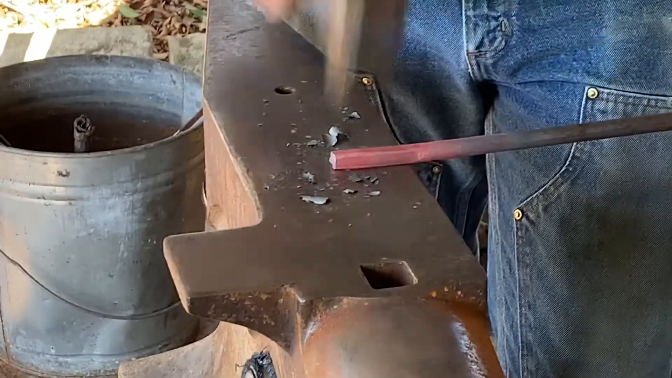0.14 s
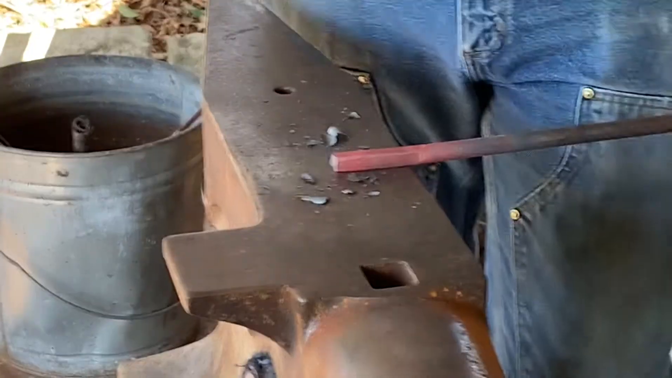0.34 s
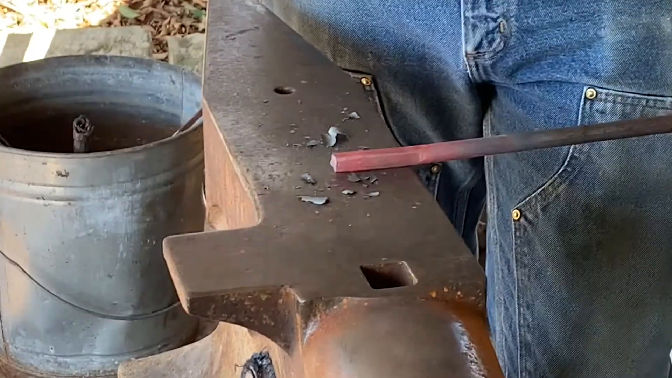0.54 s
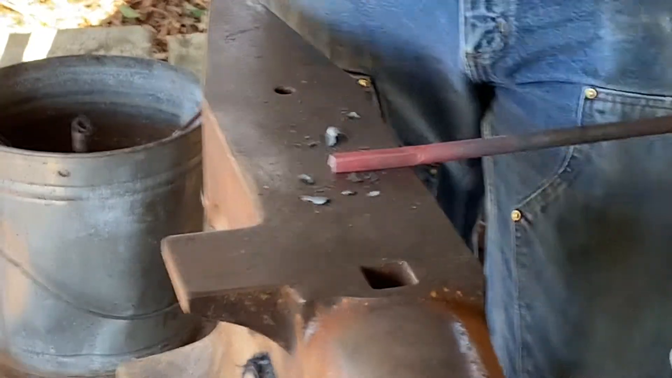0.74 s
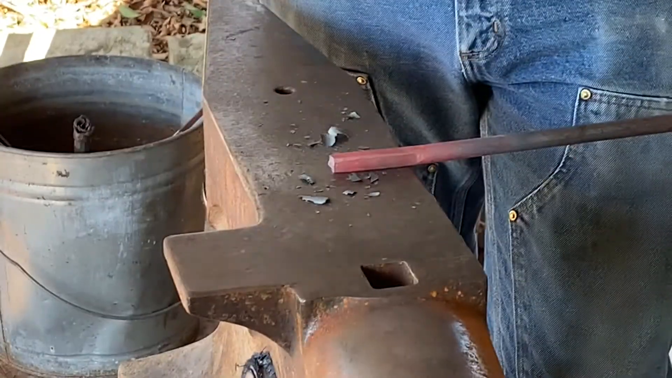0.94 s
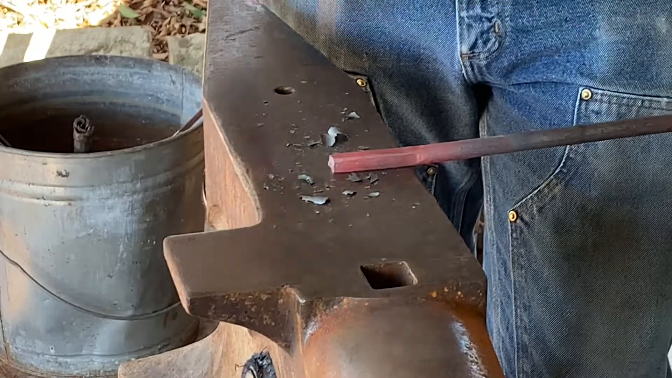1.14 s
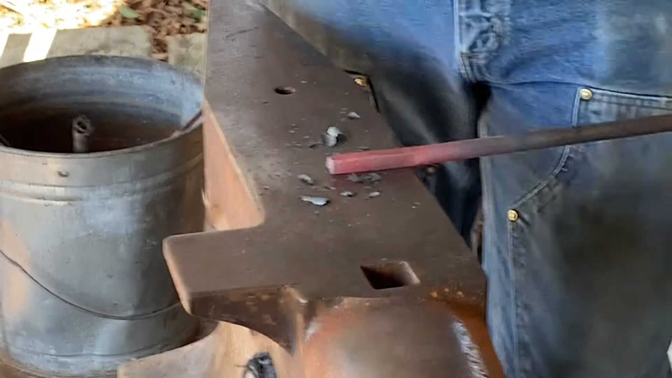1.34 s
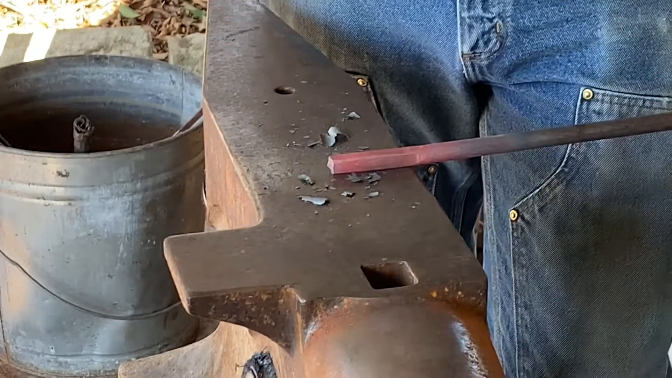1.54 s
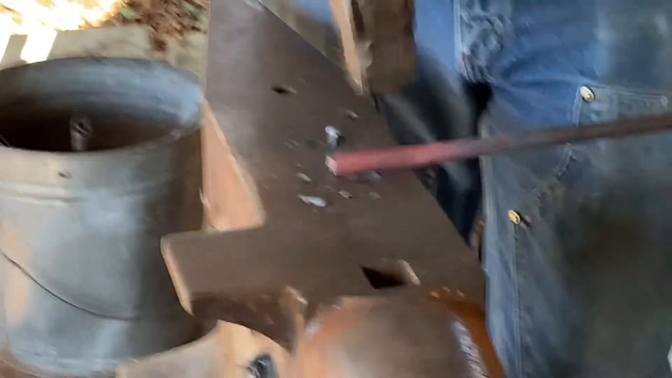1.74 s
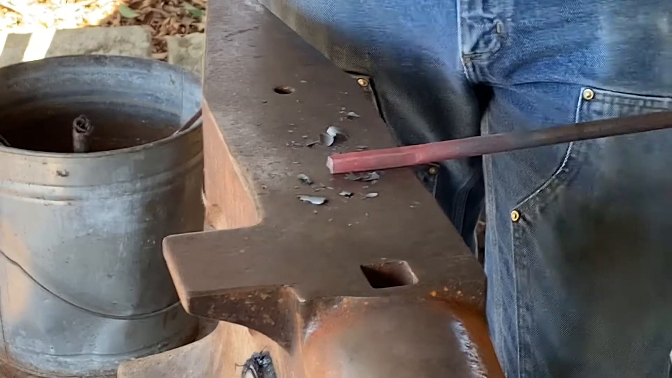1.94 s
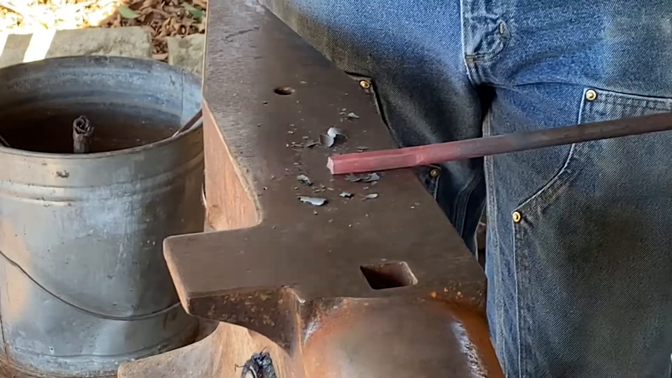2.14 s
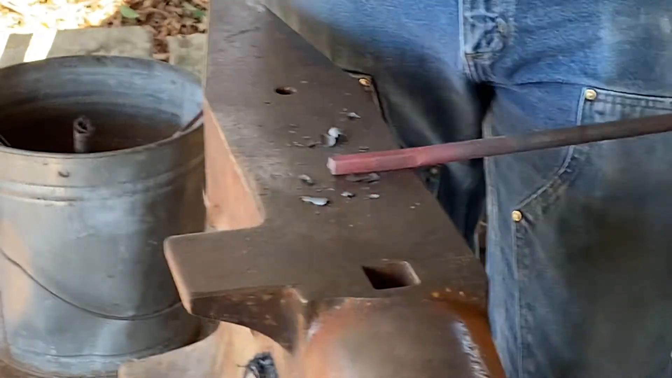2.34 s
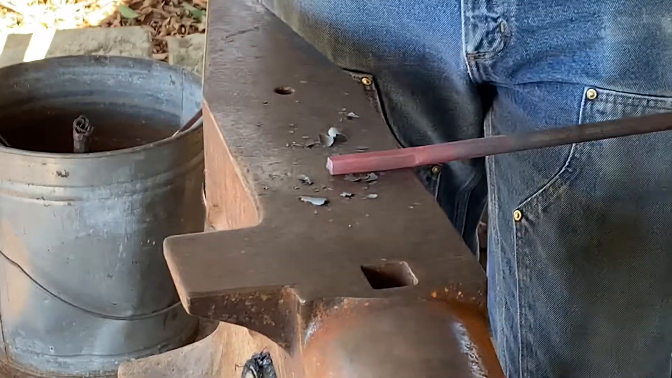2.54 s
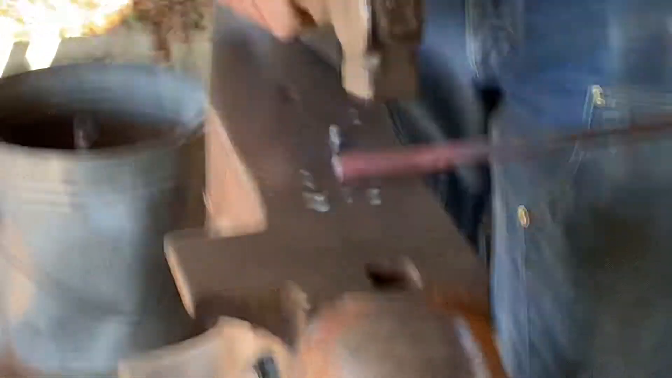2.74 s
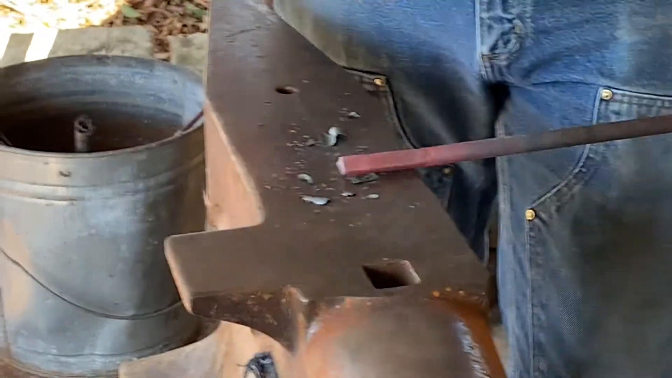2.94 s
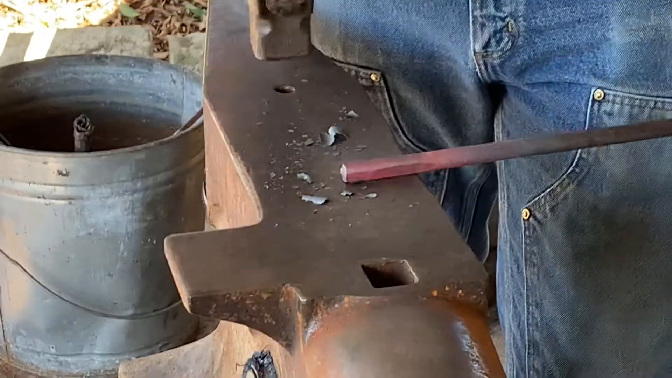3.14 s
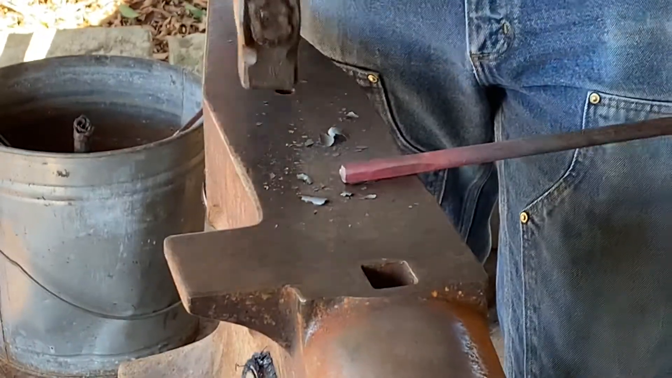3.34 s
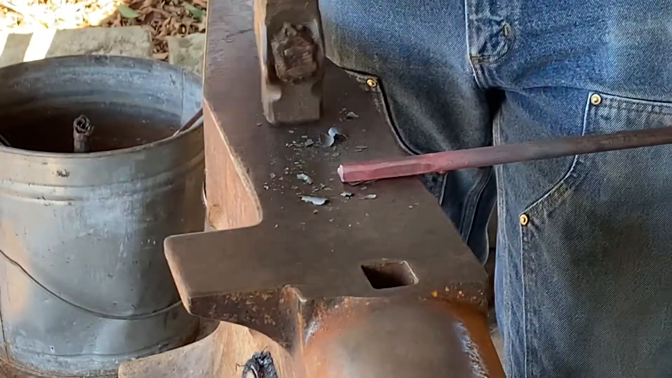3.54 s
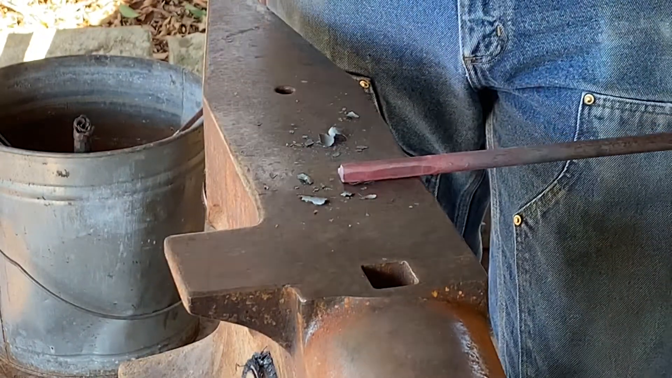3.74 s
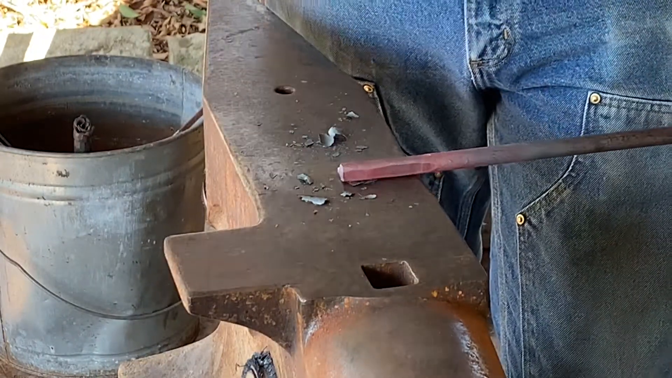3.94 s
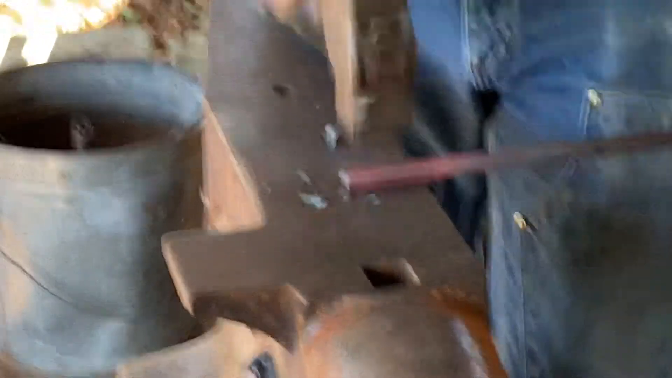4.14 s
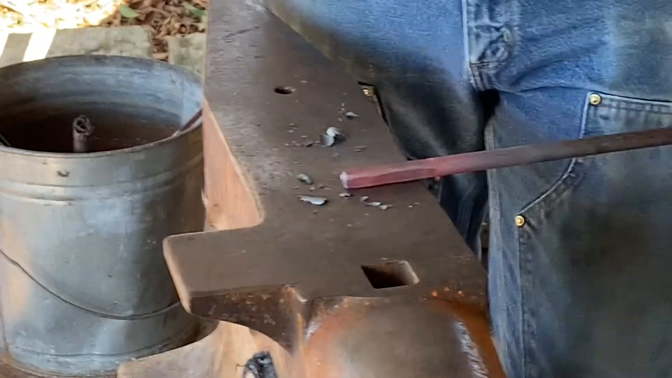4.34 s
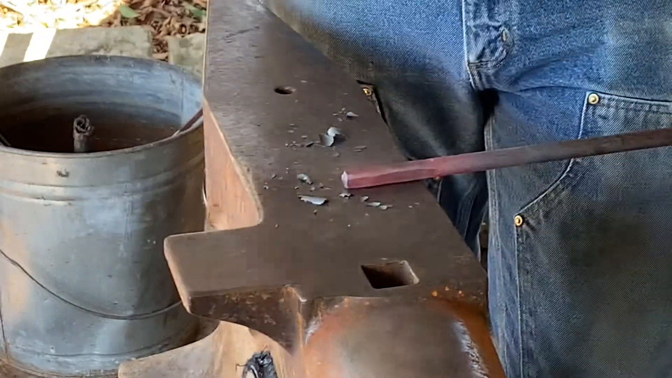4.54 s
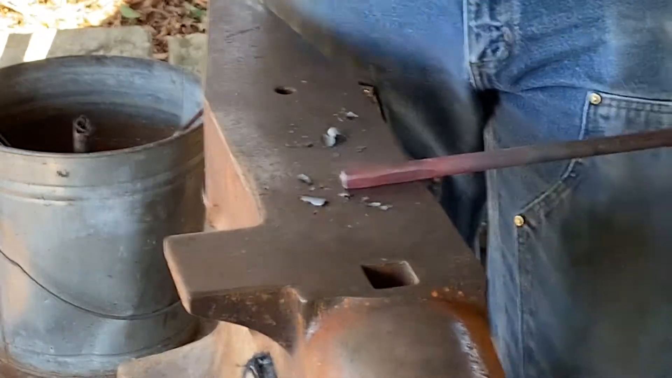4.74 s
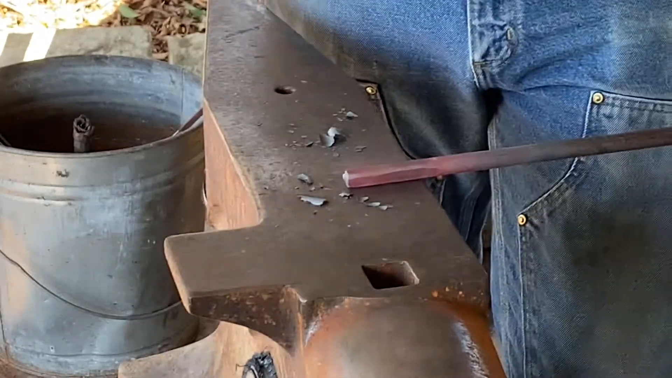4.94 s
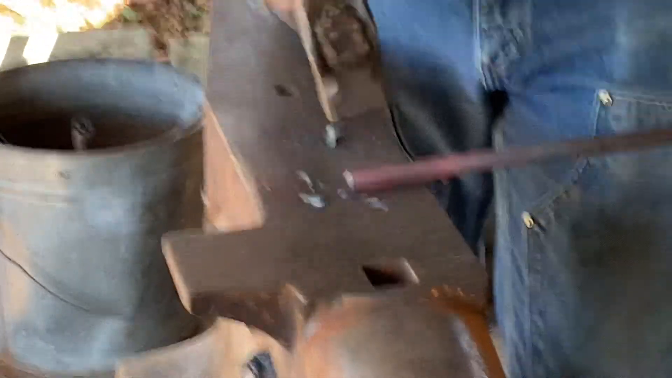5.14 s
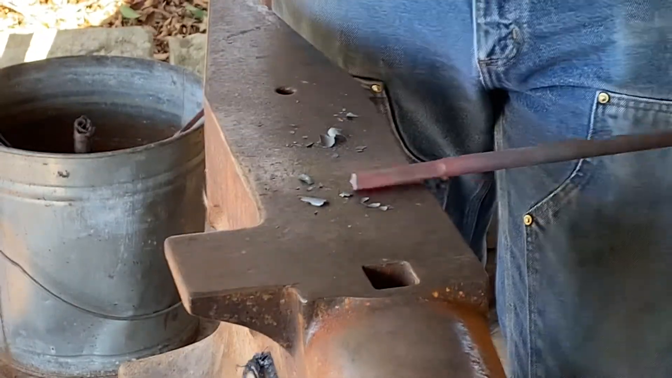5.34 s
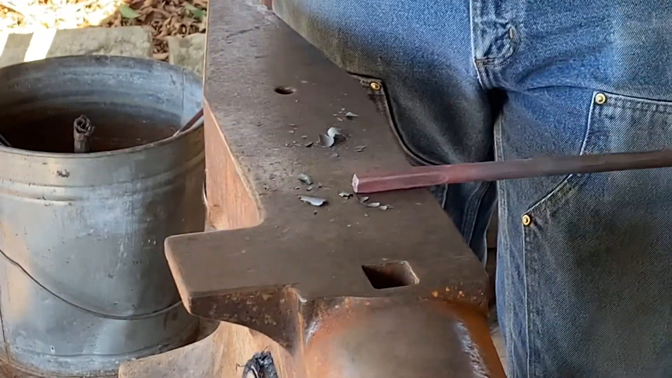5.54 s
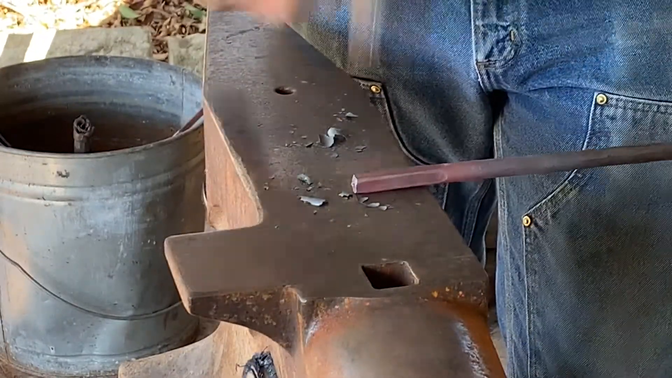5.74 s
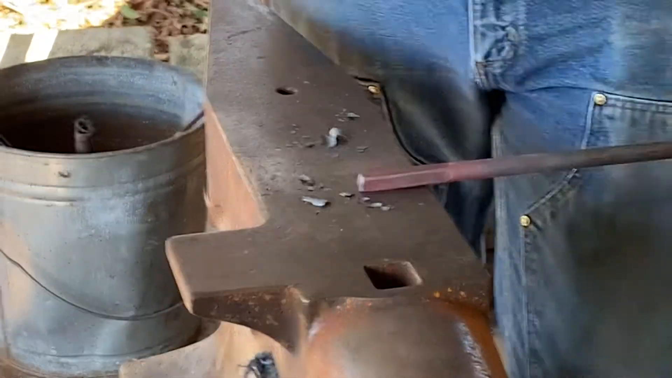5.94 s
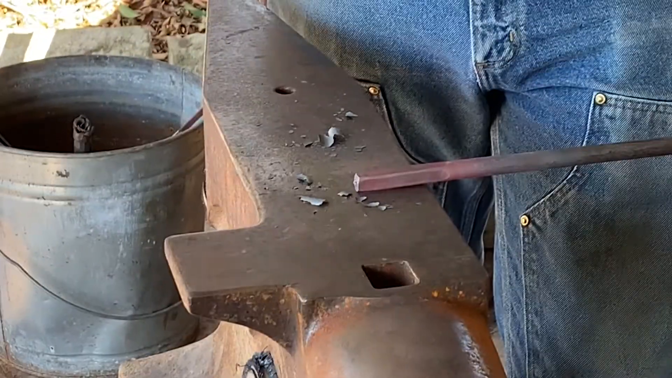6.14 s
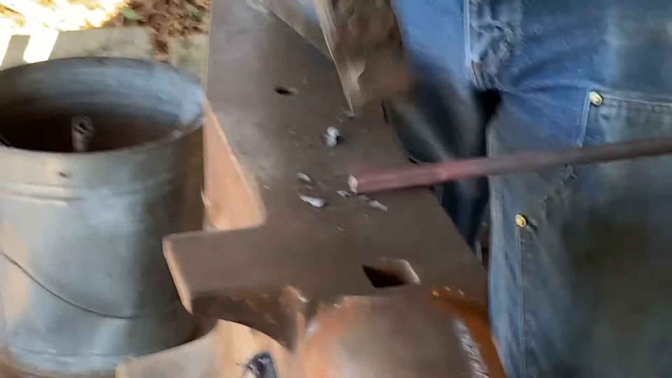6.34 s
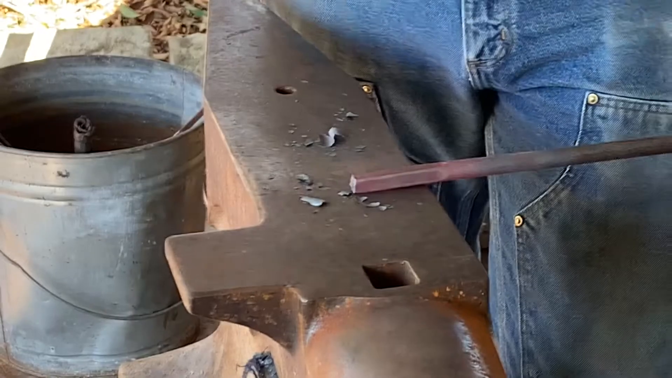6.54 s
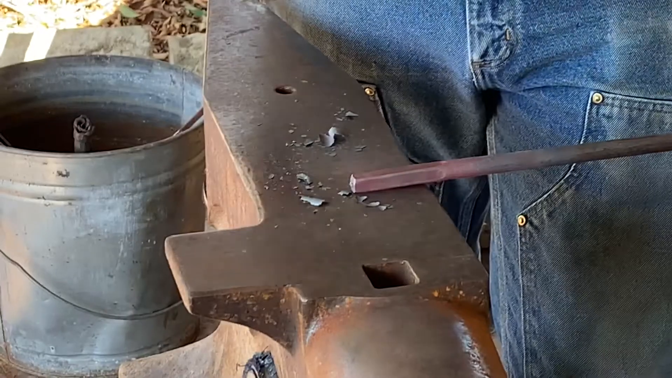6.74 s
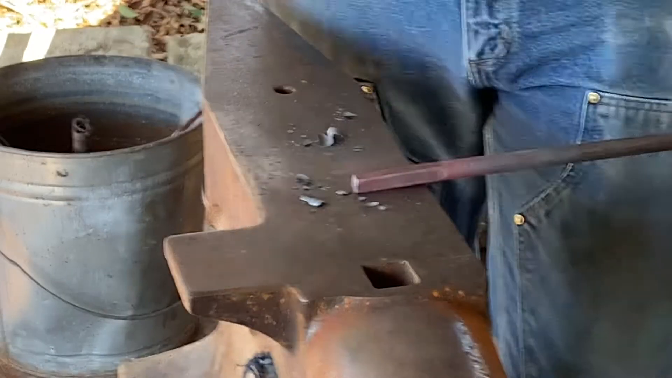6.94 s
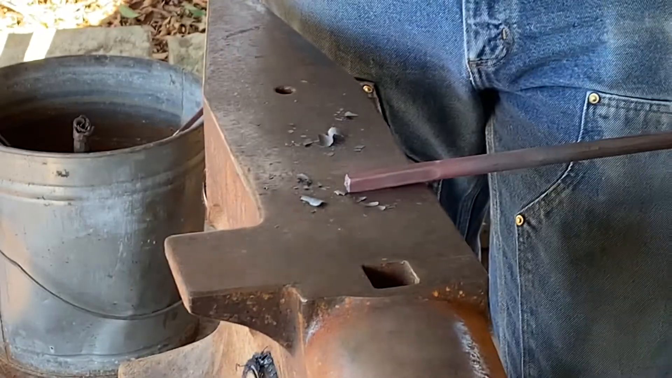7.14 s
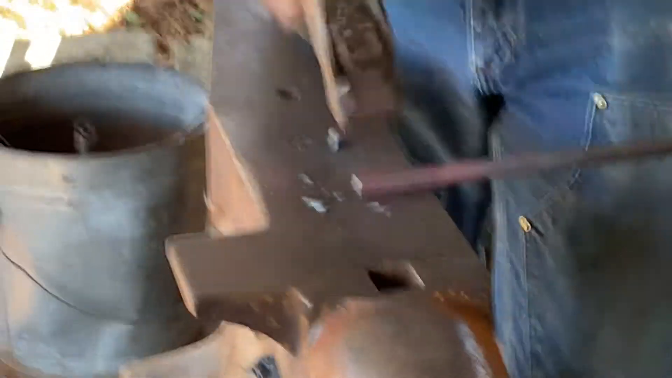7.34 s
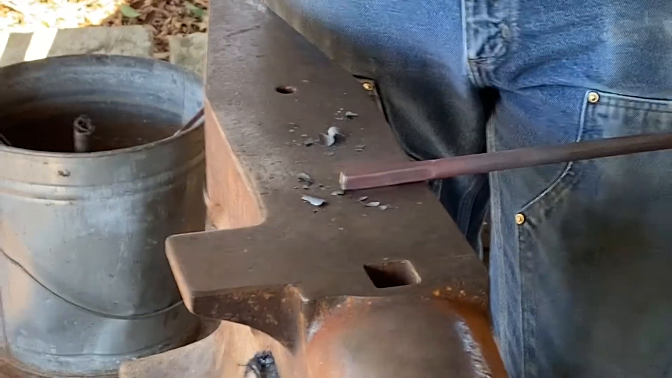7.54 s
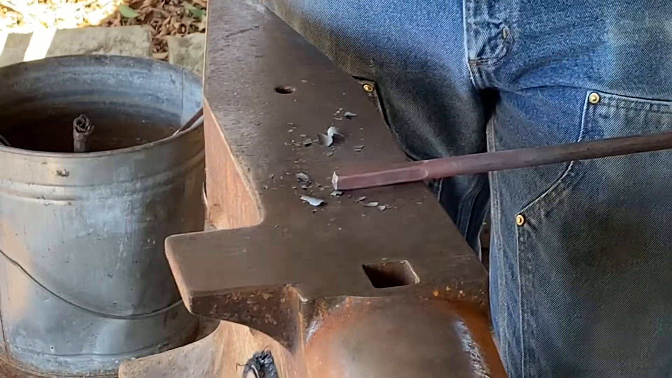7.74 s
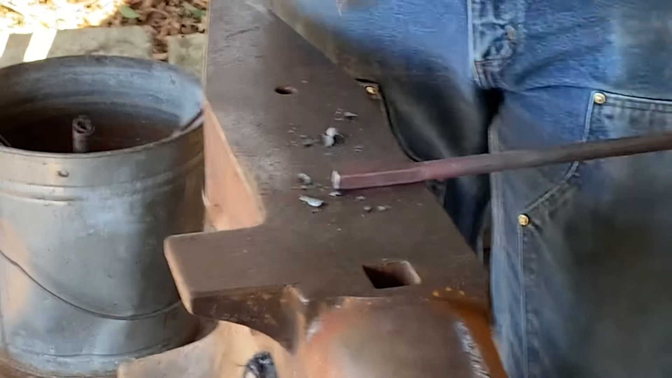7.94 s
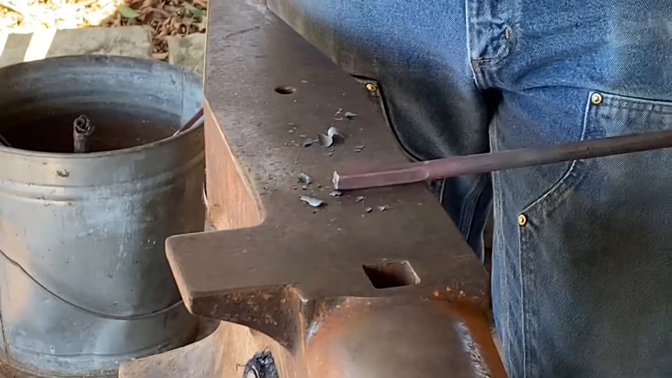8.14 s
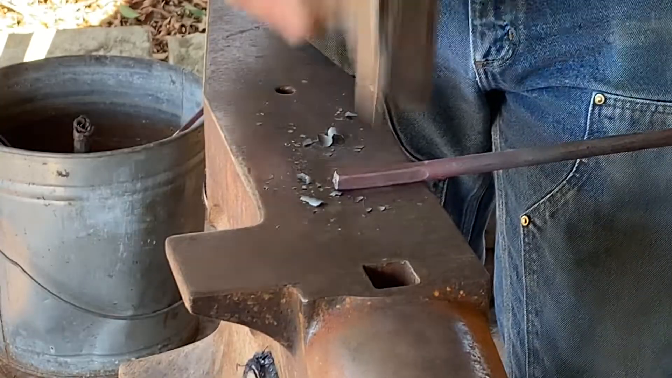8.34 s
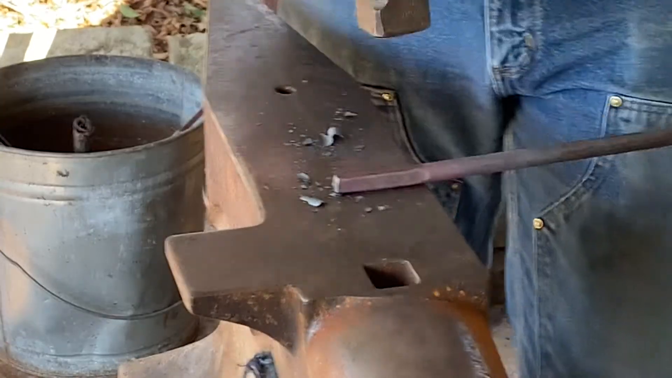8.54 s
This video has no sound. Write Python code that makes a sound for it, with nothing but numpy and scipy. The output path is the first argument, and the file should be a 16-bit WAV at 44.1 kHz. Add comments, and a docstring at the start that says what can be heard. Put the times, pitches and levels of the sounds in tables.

```python
"""Under a shed roof, two microphone ports close together: a forge burner roars nearby throughout.
An old anvil ring is dying as a hand hammer begins to forge a hot bar; each blow clanks, rings the anvil
and sends a late thud through its stand. Near 3.1 s the hammer bounces to rest on the bare face.
Forging resumes at 4.1 s; at 8.1 s the bar scrapes faintly, before the last blow.
The right port hears the treble with a lag; gain control ducks the loudest moments."""
import sys
import numpy as np
from scipy import signal
from scipy.fft import rfft, irfft, next_fast_len
from scipy.io import wavfile
from scipy.ndimage import uniform_filter1d

SR = 44100
rng = np.random.default_rng(int(sys.argv[2]) if len(sys.argv) > 2 else 0)


def to_wav(s):
    """Save 16-bit WAV."""
    ch = np.atleast_2d(s).T  # columns
    pcm = np.round(np.clip(ch, -1, 1) * 32767)  # PCM
    wavfile.write(sys.argv[1], SR, pcm.astype(np.int16))


N = 378368


def amp(db):
    """Decibels to gain."""
    return 10 ** (np.asarray(db) / 20)


def at_hz(table, hz, axis=1):
    """One column of a table, joined on a log-frequency axis."""
    table = np.array(table)
    return np.interp(np.log(hz), np.log(table[:, 0]), table[:, axis])


def lowpass(x, order, hz):
    """Butterworth low-pass."""
    return signal.sosfilt(signal.butter(order, hz, fs=SR, output="sos"), x)


def bandpass(x, low_hz, high_hz):
    """Second-order Butterworth band-pass."""
    return signal.sosfilt(signal.butter(2, [low_hz, high_hz], "band", fs=SR, output="sos"), x)


# likeness of the diffuse sound at the two ports: (pitch [Hz], left-right likeness [0..1])
PORT_LIKENESS = [(100, 0.98), (300, 0.95), (700, 0.49), (1500, 0.044), (5500, 0.022), (8000, 0.94)]


def pair(mid, side, hz):
    """Left and right from two noises, as alike as the field is at this pitch."""
    alike = np.clip(at_hz(PORT_LIKENESS, hz), 0, 1)
    opposed = side * [[1], [-1]]
    return (np.sqrt(1 + alike) * mid + np.sqrt(1 - alike) * opposed) / np.sqrt(2)


# burner roar and the hiss above it: (pitch [Hz], level [dB per Hz])
ROAR_COLOUR = [(30, -26), (60, -12), (100, -6.5), (200, -9.5), (450, -10.5), (560, -17.5), (750, -31.5),
               (1300, -30), (2000, -38.5), (3100, -41), (5000, -47.5), (8500, -51.5), (11500, -43.5),
               (15500, -51.5)]
# resonances of the forge chamber: (pitch [Hz], width [Hz], boost [dB])
CHAMBER = [(162.8, 56, 13.5), (230.6, 18.3, 14.5), (317.6, 25.7, 14), (422.6, 25, 7)]
ROAR_DB = -34


def burner(flutter_db=2.0, flutter_hz=6):
    """Flame noise through the chamber resonances, fluttering a little."""
    hz = np.maximum(np.arange(N // 2 + 1) * SR / N, 1)
    colour_db = at_hz(ROAR_COLOUR, hz)
    for peak_hz, width_hz, boost_db in CHAMBER:
        colour_db = colour_db + boost_db / (1 + ((hz - peak_hz) / (width_hz / 2)) ** 2)
    mid, side = rfft(rng.standard_normal((2, N))) * amp(colour_db)
    roar = irfft(pair(mid, side, hz), N)
    flutter = lowpass(rng.standard_normal(N), 2, flutter_hz)
    level_db = ROAR_DB + flutter_db * flutter / flutter.std()
    return amp(level_db) * roar / roar.std()


# forging blows on the bar; the first falls before time zero and only its ring is left:
# (time [s], clank [dB], clank treble [dB], low ring [dB], middle ring [dB], treble ring [dB],
#  spot on the face [-1..1], lowest mode [dB re low ring], first and second long ring [dB re their family])
BLOWS = [(-0.32, -4.5, -1, -12.5, -13, -28, 0.99, 11, -0.5, 13),
         (0.194, 0.5, 0.5, -18.5, -30.5, -29, 0.7, 2, -6.5, 15),
         (0.675, -0.5, 2.5, -20.5, -17.5, -25.5, 0.71, 8, 0.5, 10),
         (1.207, -0.5, 0, -19.5, -24.5, -28.5, 0.45, 6, -2.5, -7),
         (1.72, 0, 2.5, -25, -15.5, -25.5, 0.62, 11, 4.5, 7),
         (2.225, -3.5, 4, -27, -15, -28, 0.83, 10, 5.5, -5),
         (2.744, -3.5, 6.5, -25, -14.5, -26, 0.73, 1.5, 3.5, 5),
         (4.135, -6, 1, -29.5, -37, -47, 0.56, 14, -13.5, 17),
         (4.637, -4, 5, -22, -27, -34.5, 0.46, -1, -0.5, -9),
         (5.13, -4, 1, -20, -27, -32, 0.19, -1.5, -3.5, -15),
         (5.808, -3, 2.5, -23, -15, -27, 0.32, -2, -6, 10), (6.317, 0, 0, -20.5, -25.5, -33, 1, 6, -8, 8),
         (6.831, -1.5, 5, -15, -17, -30, 1, 1.5, -4, 8),
         (7.336, -3.5, 4, -19, -19.5, -29.5, 0.88, 1, -3, 12),
         (7.837, -3, -1, -21.5, -16, -27.5, -0.055, 11, -3.5, 13.5),
         (8.406, -2, 2, -16.5, -12, -31, 0.95, 3, -4, 8)]
# the hammer, dropped on the bare face, bounces to rest:
# (time [s], clank [dB], clank treble [dB], hammer ring [dB])
BOUNCES = [(3.101, -14, -18.5, -20), (3.298, -17.5, -26, -24), (3.415, -17.5, -33, -29.5),
           (3.493, -20, -37, -30)]
# anvil rings under a bounce: (low [dB re hammer ring], middle [same], treble [dB re clank treble])
BOUNCE_RINGS_DB = [-26.5, -16, -23.5]
BOUNCE_SPOT = -0.52   # where bounces land on the face, -1..1


def contacts():
    """Blows and bounces in time order; columns as for a blow, then the hammer ring in dB."""
    low_db, middle_db, treble_ring_db = BOUNCE_RINGS_DB
    rows = [row + (-np.inf,) for row in BLOWS]   # no hammer ring on the soft bar
    for s, clank_db, treble_db, head_db in BOUNCES:
        rings_db = (head_db + low_db, head_db + middle_db, treble_db + treble_ring_db)
        rows.append((s, clank_db, treble_db) + rings_db + (BOUNCE_SPOT, 0, 0, 0, head_db))
    return np.array(sorted(rows)).T


def clicks(gains):
    """One click at each contact from time zero on."""
    s = contacts()[0]
    out = np.full(N, 1e-18)
    out[np.round(s[s >= 0] * SR).astype(int)] = gains[s >= 0]
    return out


def fade(gains, t60):
    """An envelope that jumps at each click and dies."""
    return signal.lfilter([1], [1, -amp(-60 / (t60 * SR))], clicks(gains))


# anvil mode pitches: (pitch [Hz])
ANVIL_HZ = [1765, 1811, 3049, 3202, 5660, 5770, 5927, 6595, 7638, 7861, 8080, 8235, 8420, 8622, 8723, 8990,
            9372, 9793, 10055, 10513, 13677, 14210, 14505, 15056, 15366, 15485, 3035, 3056, 1816]
STOP_S = 0.0024   # a blow fades the old ring out in this time


def rings(hz, t60, struck_db, bloom):
    """Modes build and die after every contact, dealt into five groups; a blow stops older rings."""
    s, blows, t = contacts()[0], np.array(BLOWS)[:, 0], np.arange(SR) / SR
    hz, t60 = np.array(hz)[:, None], np.array(t60)[:, None]
    envelopes = np.minimum(t * hz / bloom, 1) * amp(-60 * t / t60)
    shapes = envelopes * np.sin(2 * np.pi * hz * t)
    # the twin of the low ring starts against it, so the pair swells
    shapes[hz[:, 0] == ANVIL_HZ[-1]] *= -1
    dealt = np.arange(5)[:, None] == np.arange(len(hz)) % 5
    out = np.zeros((5, N + 2 * SR))   # a spare second at each end
    for start, gains in zip(s, amp(struck_db).T):
        left = np.append(blows[blows > start], np.inf)[0] - start   # time to the next blow
        at = SR + round(start * SR)
        out[:, at:at + SR] += (dealt * gains) @ shapes * np.clip(1 + (left - t) / STOP_S, 0, 1)
    return out[:, SR:SR + N]


# anvil modes at those pitches: (level [dB within the family], t60 [s])
ANVIL = [(7, 0.17), (0, 0.64), (5, 0.24), (1, 0.09), (3, 0.28), (-6, 0.36), (-7, 1.14), (-5, 0.4), (8, 0.2),
         (5, 0.27), (-1.5, 0.15), (2, 1.4), (1.5, 0.4), (4, 0.95), (-8.5, 0.6), (-8.5, 0.2), (-0.5, 0.38),
         (7, 0.3), (-13.5, 0.44), (-1.5, 0.5), (8, 0.99), (0.5, 1.4), (7.5, 0.76), (-1, .59), (2, 0.43),
         (-1, 0.5), (-19, 0.5), (-15, 0.5), (-10, 0.35)]
# families of treble modes of the anvil: (pitch [Hz], level [dB re treble ring], tilt [dB per unit of spot])
FAMILIES = [(5800, 2, -4.5), (8337, -9, 14.5), (8835, 1, -2), (9800, 0, 1.5), (10510, -3, 14.5),
            (14200, -22, -4), (15300, -16.5, 9)]
# long modes whose strength differs from blow to blow: (pitch [Hz])
LONG_RING_HZ = [5927, 14210]
# hammer head, heard in bounces: (pitch [Hz]); (level [dB re hammer ring], t60 [s])
HAMMER_HZ = [3391, 3974, 4422, 4692, 6783, 4560]
HAMMER = [(-9, 0.2), (-9.5, 0.2), (-7, 0.3), (-8, 0.07), (-20, 0.33), (-17, 0.12)]
# wooden handle, heard in bounces: (pitch [Hz]); (level [dB re hammer ring], t60 [s])
HANDLE_HZ = [484, 528, 1114]
HANDLE = [(4, 0.09), (-9, 0.2), (-0.5, 0.057)]
# bar: (pitch [Hz]); (level [dB re clank], t60 [s])
BAR_HZ = [742, 966, 1111, 2231]
BAR = [(-27, 0.24), (-30, 0.16), (-36.5, 0.39), (-29, 0.29)]
LOW_RING_TOP_HZ, MIDDLE_RING_TOP_HZ = 2300, 4200
# cycles a mode takes to build: low ring; lowest mode and middle ring; treble and hammer; short modes
LOW_SWELL_CYCLES, SWELL_CYCLES, BLOOM_CYCLES, CLANG_BLOOM_CYCLES = 70, 110, 5.3, 6.2


def anvil_strengths():
    """Strength of each anvil mode at each contact, in dB: by register, and in the treble by spot."""
    _, _, _, low_db, middle_db, treble_db, spot, lowest_db, *long_db, _ = contacts()
    family_hz, family_db, per_spot_db = np.transpose(FAMILIES)
    struck_db = []
    for hz in ANVIL_HZ:
        k = np.argmin(abs(np.log(hz / family_hz)))   # nearest family
        if hz < LOW_RING_TOP_HZ:
            struck_db.append(low_db)
        elif hz < MIDDLE_RING_TOP_HZ:
            struck_db.append(middle_db)
        else:
            struck_db.append(treble_db + family_db[k] + per_spot_db[k] * spot)
    struck_db[0] = low_db + lowest_db
    for hz, db in zip(LONG_RING_HZ, long_db):
        k = ANVIL_HZ.index(hz)
        struck_db[k] = struck_db[k] + db
    return struck_db


def anvil_bloom(hz):
    """Cycles an anvil mode takes to build: the low and middle rings are slower."""
    if ANVIL_HZ[0] < hz < LOW_RING_TOP_HZ:
        return LOW_SWELL_CYCLES
    return SWELL_CYCLES if hz < MIDDLE_RING_TOP_HZ else BLOOM_CYCLES


def metal(scatter_db=2.0, waver=0.13, waver_hz=11):
    """Anvil, hammer, handle and bar ring as decaying sine modes."""
    s, clank_db, *_, head_db = contacts()
    struck_db = anvil_strengths() + [head_db] * len(HAMMER + HANDLE) + [clank_db] * len(BAR)
    level_db, t60 = np.transpose(ANVIL + HAMMER + HANDLE + BAR)
    scatter = rng.normal(0, scatter_db, (len(s), len(t60))).T
    struck_db = struck_db + level_db[:, None] + scatter
    bloom = [anvil_bloom(hz) for hz in ANVIL_HZ]
    bloom += [BLOOM_CYCLES] * len(HAMMER) + [CLANG_BLOOM_CYCLES] * len(HANDLE + BAR)
    all_hz = ANVIL_HZ + HAMMER_HZ + HANDLE_HZ + BAR_HZ
    groups = rings(all_hz, t60, struck_db, np.array(bloom)[:, None])
    # the rings waver, neighbouring modes apart from each other and a little differently on each side
    slow = lowpass(rng.standard_normal((2, 5, N)), 2, waver_hz)
    slow = slow + slow[0]
    return np.sum(groups * (1 + waver * slow / slow.std()), axis=1)


# clank: (pitch [Hz], level [dB per Hz], first t60 [s], tail level [dB re first], tail t60 [s])
CLANK = [(125, -12, 0.42, -22, 0.28), (256, -5.5, 0.074, -2.5, 0.16), (440, -8, 0.24, -20.5, 0.3),
         (578, -12, 0.22, -29.5, 0.72), (1115, -10.5, 0.079, -24, 0.64), (1980, -10.5, 0.11, -20, 0.69),
         (4020, -27.5, 0.3, -27, 0.93), (7480, -23.5, 0.1, -13.5, 0.22), (9100, -18.5, 0.021, -14, 0.088),
         (12400, -17, 0.054, -21, 0.48), (15700, -25, 0.058, -10, 0.6)]
# a bright bite in the clank when a blow lands on the far half of the face
BITE_HZ, BITE_OCTAVES, BITE_DB = 5050, 0.064, 18.5


def clank_level(hz):
    """Strength of each contact at one pitch in dB, and how far into the treble that pitch lies, 0..1."""
    _, clank_db, treble_db, _, _, _, spot, *_, head_db = contacts()
    bite_db = BITE_DB * (spot < 0) * np.isinf(head_db)   # blows only, not bounces
    bright = np.clip(np.log2(hz / 2000) / 2, 0, 1) ** 2
    bite = np.exp(-(np.log2(hz / BITE_HZ) / BITE_OCTAVES) ** 2)
    level_db = (1 - bright) * clank_db + bright * treble_db + bite * bite_db + at_hz(CLANK, hz)
    return level_db, bright


NOISE_DB, NOISE_TREBLE_DB = 9, -5.5   # noisy part re clank level; change towards the treble
CRACK_DB, CRACK_T60_S = 5.5, 0.012   # first instant of contact, re noisy part


def clank(grain_db=2.0, rise_s=0.0013):
    """Dense short modes and roof echoes: grainy noise dying band by band, fast and then slow."""
    out = 0
    grain = amp(grain_db * np.repeat(rng.standard_normal(N // 40 + 1), 40)[:N])
    white = rng.standard_normal((2, 2, N)) * grain
    edges = 90 * 2 ** np.arange(0, 7.6, .5)   # half-octave bands [Hz]
    for k, (low, high) in enumerate(zip(edges, edges[1:])):
        hz = np.sqrt(low * high)
        mid, side = bandpass(white[k % 2], low, high)
        level_db, bright = clank_level(hz)
        gains = amp(level_db + NOISE_DB + NOISE_TREBLE_DB * bright)
        crack = amp(CRACK_DB) * fade(gains, CRACK_T60_S)
        first = fade(gains, at_hz(CLANK, hz, axis=2))
        tail = amp(at_hz(CLANK, hz, axis=3)) * fade(gains, at_hz(CLANK, hz, axis=4))
        slow = np.exp(-1 / (SR * (rise_s + 3.3 / hz)))   # lows take a few cycles to build
        envelope = signal.lfilter([1 - slow], [1, -slow], crack + first + tail)
        out = out + pair(mid, side, hz) * envelope
    return out


CLANG_DB, CLANG_SCATTER_DB = -12, 4   # level re clank level; spread from mode to mode
CLANG_T60_S = 0.1   # median
CLANG_LOW_HZ, CLANG_HIGH_HZ = 800, 15600   # before the pitch change
CLANG_SHIFT, CLANG_WIDTH = 0.0308, 0.22   # pitch change per contact as a share; left-right spread


def clang(count=170):
    """A crowd of short steel modes whose pitches and strengths change with every contact."""
    s, t, out = contacts()[0], np.arange(SR // 5) / SR, np.zeros((2, N + SR))
    rest_hz = rng.uniform(np.sqrt(CLANG_LOW_HZ), np.sqrt(CLANG_HIGH_HZ), count) ** 2
    shift, scatter, lasting, side = np.moveaxis(rng.standard_normal((len(s), 4, count)), 1, 0)
    for k in np.flatnonzero(s >= 0):
        hz = rest_hz * (1 + CLANG_SHIFT * shift[k])
        t60 = CLANG_T60_S * amp(2.4 * lasting[k])
        level_db = clank_level(hz[:, None])[0][:, k]
        gains = amp(level_db + CLANG_DB + CLANG_SCATTER_DB * scatter[k])
        cycles = np.outer(hz, t)
        envelopes = np.minimum(cycles / CLANG_BLOOM_CYCLES, 1) * amp(-60 * t / t60[:, None])
        shapes = envelopes * np.sin(2 * np.pi * cycles)
        at = round(s[k] * SR)
        out[:, at:at + len(t)] += gains * (1 + CLANG_WIDTH * side[k] * [[1], [-1]]) @ shapes
    return out[:, :N]


SHED_DB, SHED_T60_S = -8.5, 0.2   # echoes from roof and posts
SHED_CUT_HZ = 6000   # echoes are dull above this


def shed(x):
    """Scattered echoes, other ones on each side: rings swell, beat and break up."""
    t = np.arange(SR // 2) / SR
    echoes = rng.standard_normal((2, len(t))) * amp(-60 * t / SHED_T60_S) * np.minimum(t / .008, 1)
    echoes = lowpass(echoes, 4, SHED_CUT_HZ)
    echoes /= np.sqrt(np.sum(echoes ** 2, axis=1, keepdims=True))
    return x + amp(SHED_DB) * signal.oaconvolve(x, echoes, axes=1)[:, :N]


THUD_DB = -21.5   # re clank


def thud(hz=72, peak_s=0.042, steep=3.4):
    """The stand rocks on the ground: a low tone that swells late and stops soon."""
    t = np.arange(SR // 4) / SR
    swell = (t / peak_s * np.exp(1 - t / peak_s)) ** steep
    shape = swell * np.cos(2 * np.pi * hz * (t - .0505))
    return signal.oaconvolve(clicks(amp(contacts()[1] + THUD_DB)), shape)[:N]


SCRAPE_S, SCRAPE_LENGTH_S, SCRAPE_DB = 8.12, 0.03, -59   # middle of the swell; time to fall to 1/e
SCRAPE_HZ, SCRAPE_WIDTH_HZ = 4880, 1100


def scrape():
    """The bar slides on the face: a faint swell of gritty band-passed noise."""
    grit = rng.standard_normal((2, N)) * rng.exponential(1, N)
    band = bandpass(grit, SCRAPE_HZ - SCRAPE_WIDTH_HZ / 2, SCRAPE_HZ + SCRAPE_WIDTH_HZ / 2)
    band = band / np.sqrt(4 * SCRAPE_WIDTH_HZ / SR)   # to about unit level
    swell = np.exp(-((np.arange(N) / SR - SCRAPE_S) / SCRAPE_LENGTH_S) ** 2)
    return amp(SCRAPE_DB) * swell * band


# right port against left: (pitch [Hz], lag [radians], gain [dB])
PORTS = [(700, 0, 0), (1800, 1.2, -1), (2300, 1.9, -2), (3050, .3, 1), (5000, .6, 2), (5600, 2.2, 2.5),
         (6150, 5.7, 1), (6800, 6, 0), (7840, 3.7, 0), (9130, 2.8, 0), (10400, .4, 0), (11500, -.4, 0),
         (12700, -2.9, 0), (13900, -3.4, 0), (15200, -6.2, 0)]


def right_port(x):
    """The right microphone port hears each pitch with its own phase lag and gain."""
    size = next_fast_len(N + 4096)
    hz = np.arange(size // 2 + 1) * SR / size
    port_hz, lag, gain_db = np.transpose(PORTS)
    port = amp(np.interp(hz, port_hz, gain_db)) * np.exp(-1j * np.interp(hz, port_hz, lag))
    return irfft(rfft(x, size) * port, size)[:N]


def scene():
    """Everything as it reaches the two ports; only the rings and short modes go through the shed echoes."""
    left, right = shed(metal() + clang()) + thud() + clank() + burner() + scrape()
    return np.array([left, right_port(right)])


TREBLE_EDGE_HZ, CUTOFF_HZ = 15750, 16990


def record(dry, knee_db=-22, share=0.39, release_db_s=60):
    """Gain control backs off by a share of the excess above the knee and recovers; the top is cut."""
    power = uniform_filter1d(np.mean(dry ** 2, axis=0), size=220)
    level_db = 10 * np.log10(power + 1e-12)
    ramp = release_db_s * np.arange(N) / SR
    held_db = np.maximum.accumulate(level_db + ramp) - ramp   # falls no faster than the release
    duck_db = uniform_filter1d(share * np.maximum(held_db - knee_db, 0), size=100)
    ducked = dry * amp(-duck_db)
    # a shallow step down at the treble edge, then a deep cut
    dull = signal.sosfilt(signal.cheby2(8, 22, TREBLE_EDGE_HZ + 150, fs=SR, output="sos"), ducked)
    return signal.sosfilt(signal.cheby2(12, 70, CUTOFF_HZ, fs=SR, output="sos"), dull)


dry = scene()
out = record(dry)
to_wav(out)
```